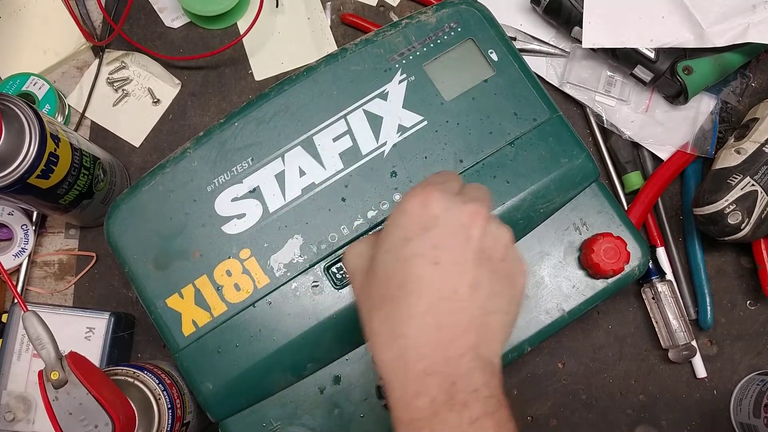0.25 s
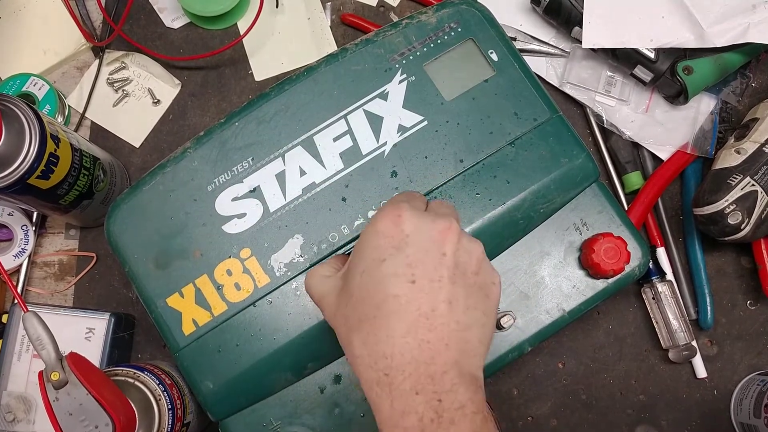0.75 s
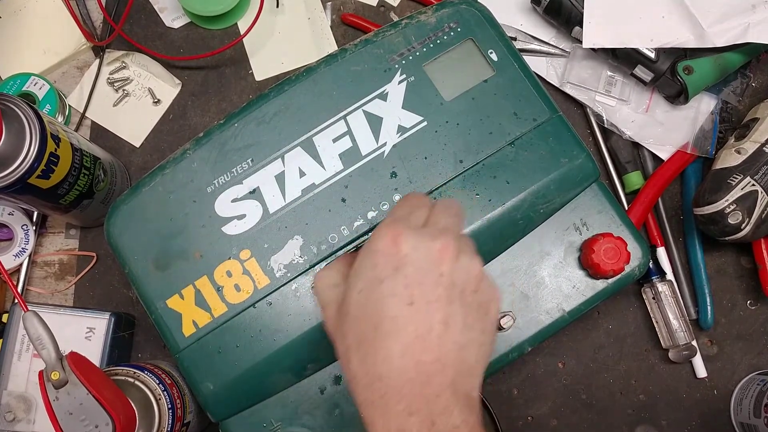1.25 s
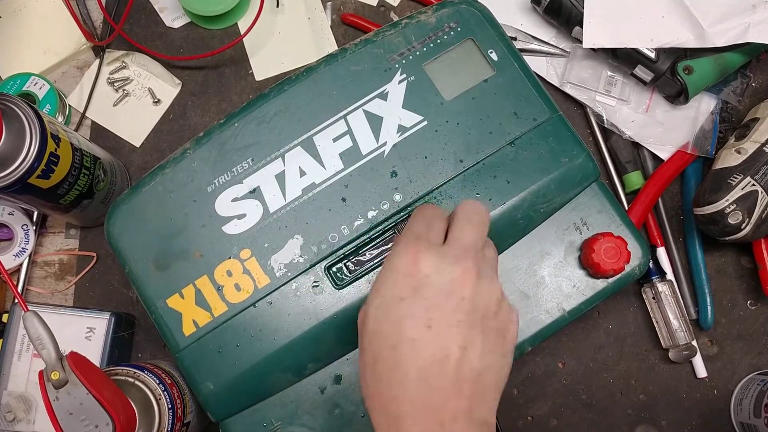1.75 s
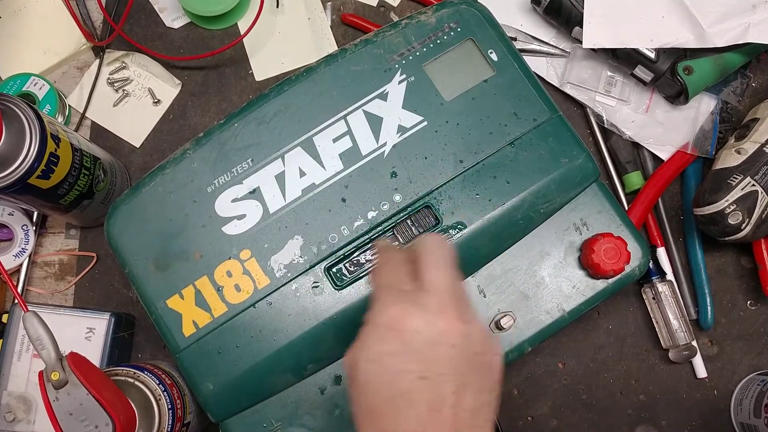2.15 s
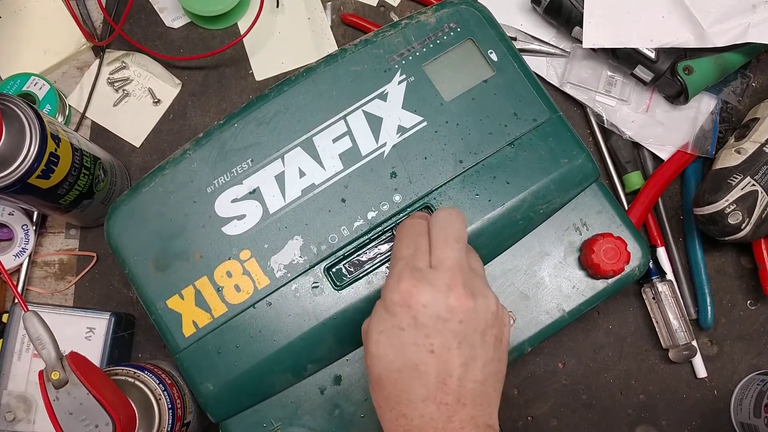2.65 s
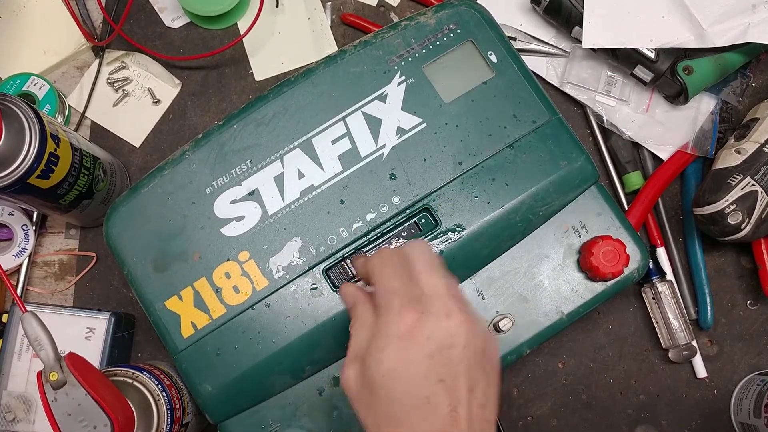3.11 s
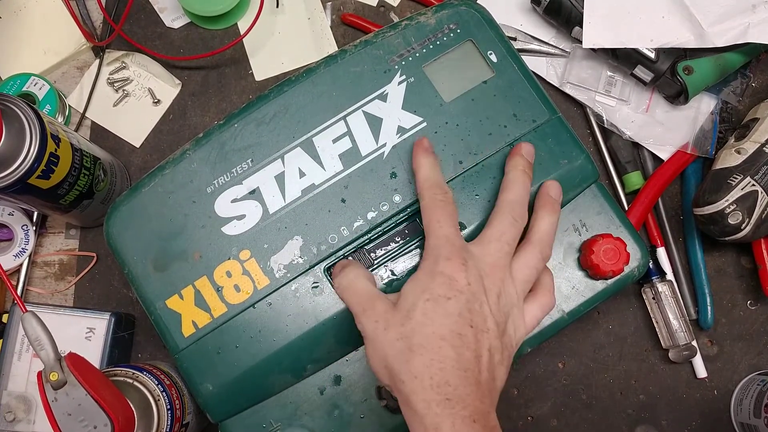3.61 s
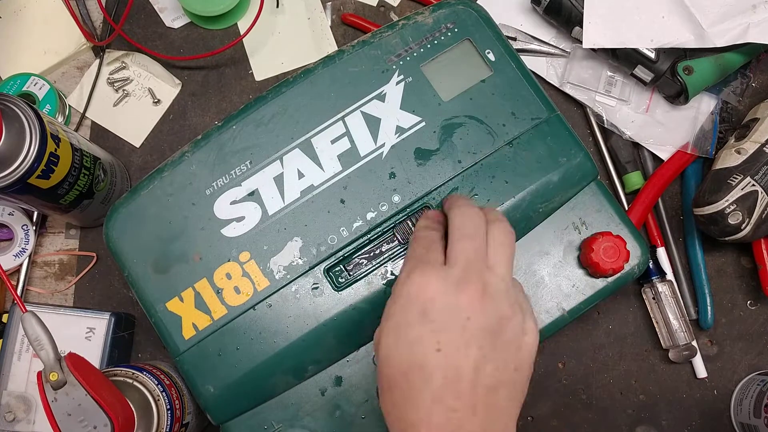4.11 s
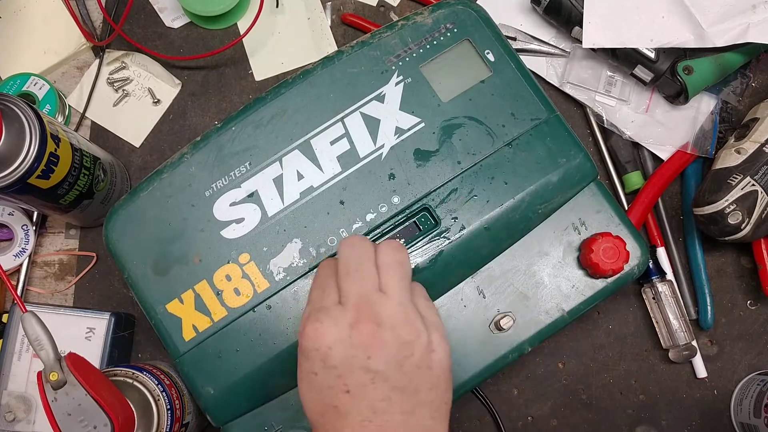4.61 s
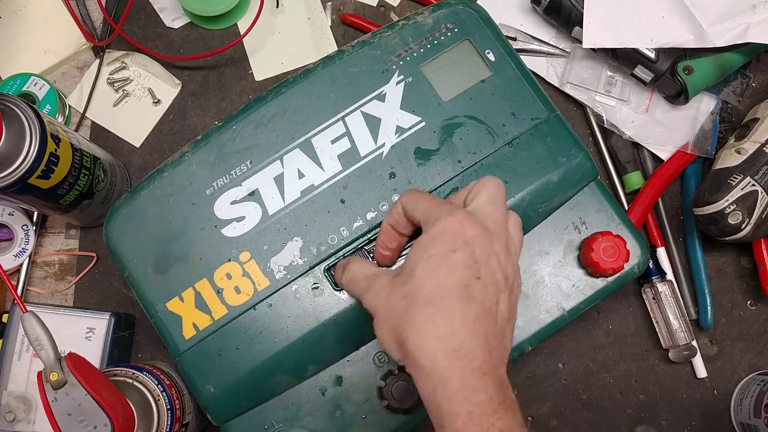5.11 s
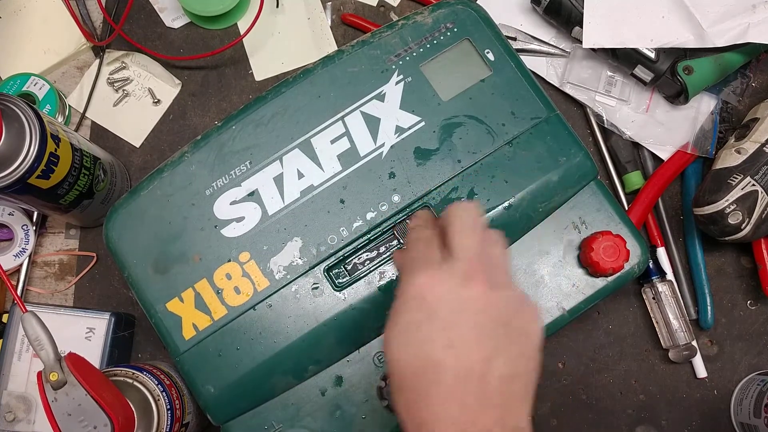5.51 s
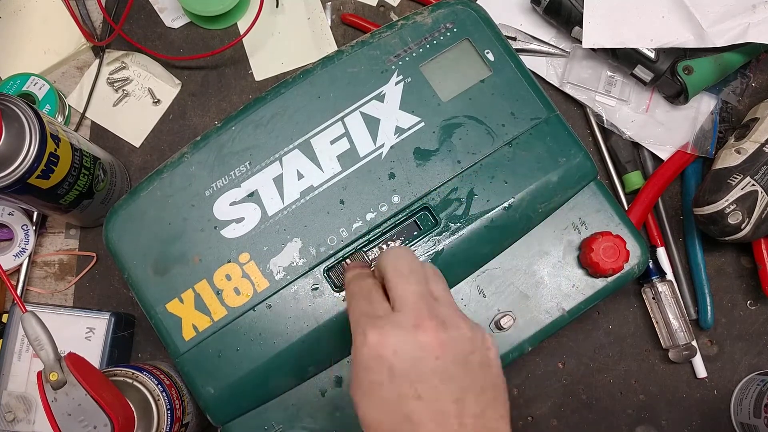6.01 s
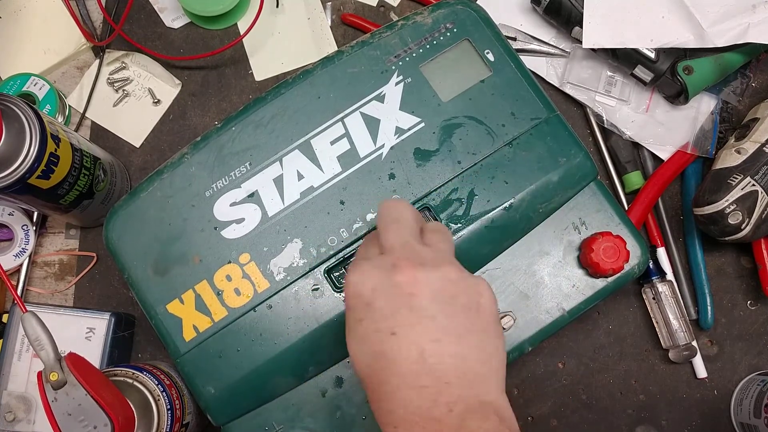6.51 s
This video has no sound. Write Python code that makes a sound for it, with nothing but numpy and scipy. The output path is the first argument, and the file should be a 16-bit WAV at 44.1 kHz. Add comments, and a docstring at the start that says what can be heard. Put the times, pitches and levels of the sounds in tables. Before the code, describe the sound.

Sharp, bright clicks in quick bursts as a notched plastic switch snaps along its track, with hollow knocks and light fingertip taps between.

```python
"""Sharp plastic snaps with a hollow knock: a hand pushes a stiff slider back and forth on a hollow plastic case.
Its spring snaps over a few notches per push, later over five; shaped noise bursts ring spring, slider and case.
In between, fingers tap, nails flick and skin brushes, all shaped noise; lid and cavity add low thumps of sine and noise.
A small room answers over a very faint noise floor, and the sound sits almost wholly on the left.
"""
import sys
import numpy as np
from scipy import signal
from scipy.fft import rfft, irfft, next_fast_len
from scipy.io import wavfile
from scipy.ndimage import uniform_filter1d, map_coordinates

SR = 44100
rng = np.random.default_rng(int(sys.argv[2]) if len(sys.argv) > 2 else 0)


def unload_audio(sound):
    """Save the sound as a 16-bit wav file, at the path given as the first command line argument."""
    columns = np.transpose(np.atleast_2d(sound))
    # keep every value between -1 and 1, then stretch to whole-number steps
    steps = np.round(np.clip(columns, -1, 1) * 32767)
    wavfile.write(sys.argv[1], SR, steps.astype(np.int16))


N = 297675  # length in samples


def amp(db):
    """Turn decibels into a plain multiplier."""
    return 10 ** (np.asarray(db) / 20)


def unit(x):
    """Scale to an average power of one."""
    return x / np.sqrt(np.mean(np.abs(x) ** 2) + 1e-20)


def along(points, hz):
    """Read a curve of (Hz, value) points, joined by straight lines on a log frequency axis."""
    point_hz, value = np.transpose(points)
    return np.interp(np.log(hz + 1), np.log(point_hz), value)


def filtered(x, response):
    """Multiply the spectrum of x by a response that depends on frequency."""
    m = next_fast_len(N + SR // 2)  # spare room keeps the ringing from wrapping round
    hz = np.fft.rfftfreq(m, 1 / SR)
    return irfft(rfft(x, m) * response(hz), m)[..., :N]


def causal(gain):
    """Give a gain curve the minimum-phase response, which rings only after a blow, never before."""
    cepstrum = irfft(np.log(np.maximum(gain, 1e-6)))
    half = len(cepstrum) // 2
    cepstrum[1:half] *= 2
    cepstrum[half + 1:] = 0
    return np.exp(rfft(cepstrum))


def coloured(x, spectrum):
    """Colour x with a causal filter that would keep the power of white noise."""
    return filtered(x, lambda hz: causal(unit(amp(along(spectrum, hz)))))


def body(x, bed, modes, lift_db):
    """Pass x through a solid part: a few resonances stand out of a bed of dense, overlapping modes."""
    def response(hz):
        peaks = 0
        for centre, width, db in modes:
            peaks = peaks + amp(db + lift_db) / (1 + (2 * (hz - centre) / width) ** 2)
        return causal(unit(amp(along(bed, hz)) * (1 + peaks)))
    return filtered(x, response)


def add(track, s, sound):
    """Mix a short sound into the track at time s in seconds."""
    start = max(round(s * SR), 0)
    part = sound[:max(N - start, 0)]
    track[start:start + len(part)] += part


def blows(times, levels, t60, attack, crack, crack_t60, uneven_db=3.0, knot_hz=380):
    """Each blow is noise with a short crack and a longer rattle (times in s), in a random colour of its own."""
    t = np.arange(SR // 5) / SR
    knots = np.fft.rfftfreq(len(t), 1 / SR) / knot_hz
    decay = amp(-60 * t / t60) + crack * amp(-60 * t / crack_t60)
    shape = (1 - np.exp(-t / attack)) * decay
    track = np.zeros(N)
    for s, db in zip(times, levels):
        burst = rfft(shape * rng.standard_normal(len(t)))
        # even out the chance lumps of the noise, then give it smooth ones of a set size
        power = np.abs(uniform_filter1d(np.abs(burst) ** 2, size=60))
        bumps = map_coordinates(rng.standard_normal(size=256), [knots], mode="mirror")
        colour = unit(amp(uneven_db * bumps))
        evened = burst * causal(colour * np.sqrt(power.mean() / power))
        add(track, s, amp(db) * irfft(evened))
    return track


def wobble(rate):
    """A smooth random curve with this many knots a second."""
    knots = rng.standard_normal(int(N * rate / SR) + 4)
    return map_coordinates(knots, [np.arange(N) * rate / SR])


EASE_POWER = 3.5  # the hand holds its force until late in the push
CLACK_DB = -25  # the slider's level at an ordinary notch, before its trim
CLACK_FOLLOWS, KNOCK_FOLLOWS, BOOM_FOLLOWS = 0.6, 0.22, 0.1  # dB lost for each dB of easing
TRACK_NOTCHES = 4  # steps from one end of the track to the other
RUN_UP_POWER = 2.6  # momentum builds late along the track
RUN_UP_CLACK_DB, RUN_UP_KNOCK_DB, RUN_UP_BOOM_DB = 4, 6.5, 11  # gained over the whole track
SLACK_SPRING_DB, SLACK_KNOCK_DB, SLACK_BOOM_DB = 3.5, 0, -8  # relative to the clack as the slack closes
# Pushes of the slider. Each row: first notch in seconds, travel time in seconds, number of notches,
# each gap as a multiple of the one before, spring level in dB, easing by the last notch in dB,
# case knock level in dB, cavity boom level in dB, how much earlier the slack closes in seconds,
# and the clack of that in dB. All four levels are trimmed when played.
SLIDER_PUSHES = [(0.0224, 0.0407, 3, 0.97, -13, -1, -27.5, -39, 0.022, -34),
                 (0.1508, 0.037, 3, 0.92, -10.5, -2.5, -30.5, -42, 0.026, -38),
                 (0.2878, 0.04, 3, 1.1, -12, -5, -28, -42, 0.025, -33),
                 (0.418, 0.042, 3, 0.95, -12, -9, -32.5, -42.5, 0.03, -35.5),
                 (0.5449, 0.0533, 3, 1.8, -13, -21.5, -27.5, -40, 0.026, -28.5),
                 (1.0134, 0.0425, 3, 0.95, -11.5, -12, -31, -43.5, 0.016, -30),
                 (1.2157, 0.027, 2, 1, -18, -7.5, -32, -41.5, 0.0286, -33),
                 (1.5, 0.0553, 4, 1.3, -9, -1.5, -29, -38.5, 0.01, -28),
                 (2.0228, 0.0074, 2, 1, -11.5, 0, -28.5, -38, 0.013, -44),
                 (2.8522, 0.0465, 4, 0.75, -5.5, -4, -27.5, -42.5, 0.009, -30.5),
                 (3.72, 0.032, 5, 1.15, -4.5, -6, -32.5, -53, 0.007, -33.5),
                 (4.4782, 0.0454, 5, 0.86, -7, -3.5, -29.5, -50, 0.012, -32.5),
                 (5.1787, 0.031, 5, 1.05, -5, -2.5, -30, -47.5, 0.011, -41.5),
                 (5.7953, 0.0465, 5, 0.95, -5.5, -6, -30.5, -47.5, 0.0064, -31.5),
                 (6.327, 0.0423, 5, 0.96, -6, -5, -31, -48, 0.011, -39)]


def notches():
    """Each push closes the slack, then runs over notches at a changing pace: time and four levels per blow."""
    blows_by_push = []
    for first, length, count, pace, spring_db, ease_db, knock_db, boom_db, lead, slack_db in SLIDER_PUSHES:
        blows_by_push.append([[first - lead], [slack_db + SLACK_SPRING_DB], [slack_db],
                              [slack_db + SLACK_KNOCK_DB], [slack_db + SLACK_BOOM_DB]])
        k = np.arange(round(count))
        elapsed = np.cumsum(pace ** k) - 1
        eased = ease_db * (k / k[-1]) ** EASE_POWER
        run_up = (k / TRACK_NOTCHES) ** RUN_UP_POWER
        blows_by_push.append([first + length * elapsed / elapsed[-1],
                              spring_db + eased,
                              CLACK_DB + CLACK_FOLLOWS * eased + RUN_UP_CLACK_DB * run_up,
                              knock_db + KNOCK_FOLLOWS * eased + RUN_UP_KNOCK_DB * run_up,
                              boom_db + BOOM_FOLLOWS * eased + RUN_UP_BOOM_DB * run_up])
    return np.concatenate(blows_by_push, axis=1)


# Resonances of the notch spring, the slider and the hollow case.
# Each row: centre in Hz, width in Hz, height in dB before the lift that its player adds.
SPRING_MODES = [(8270, 1800, 3.5), (10430, 1100, -3.5), (12400, 100, -4.5)]
SLIDER_MODES = [(2756, 37, 6), (3690, 31, 3.5), (3740, 1600, 1.5), (4250, 76, 10.5), (6000, 1500, 1)]
CASE_MODES = [(300, 160, -1.5), (738.3, 28, -1.5), (1087, 170, -3.5), (1727, 80, -6.5), (2290, 23, -8)]
# The dense modes under those resonances, and the air inside the case.
# Each row: frequency in Hz, relative level in dB per Hz.
SPRING_DENSE = [(4100, -51.5), (6650, -13), (7750, -2.5), (9350, -6.5), (10450, -1), (12350, -1.2),
                (14050, -5), (16050, -8)]
SLIDER_DENSE = [(1250, -50.5), (2450, -4), (3020, -4), (3650, -2), (5050, -3.5), (6650, -6), (8600, -31),
                (12100, -64)]
CASE_DENSE = [(250, -30.5), (520, -1.5), (800, -2.5), (1090, 0.5), (1460, -1.5), (2350, -1.5), (3350, -25),
              (6100, -66)]
CAVITY_AIR = [(30, -31), (70, -12), (130, -13), (180, 2.5), (230, -10), (280, 8), (420, -1), (750, -12),
              (2000, -56.5)]


def detent():
    """Every notch rings the spring, the slider, the walls of the case and, longest, its cavity."""
    s, spring_db, clack_db, knock_db, boom_db = notches()
    snap = blows(s, spring_db - 3.0, t60=0.042, attack=0.00096, crack=0.64, crack_t60=0.023)
    clack = blows(s, clack_db + 5.5, t60=0.047, attack=0.0011, crack=0.72, crack_t60=0.018)
    knock = blows(s, knock_db + 4.5, t60=0.068, attack=0.00097, crack=0.67, crack_t60=0.023)
    boom = blows(s, boom_db + 8.5, t60=0.1, attack=0.0011, crack=0.43, crack_t60=0.02)
    spring = body(snap, SPRING_DENSE, SPRING_MODES, lift_db=-6.5)
    slider = body(clack, SLIDER_DENSE, SLIDER_MODES, lift_db=-11)
    walls = body(knock, CASE_DENSE, CASE_MODES, lift_db=6.5)
    cavity = coloured(boom, CAVITY_AIR)
    return spring + slider + walls + cavity


TICK_LAG_S = 0.0025  # the loose slider ticks just after the fingertip lands
# Fingers landing on the case. Each row: time in seconds, knock level in dB, tick level in dB (before trims).
FINGER_TAPS = [(0.663, -50, -48), (0.937, -49, -61), (0.955, -40, -45.5), (1.286, -33.5, -54),
               (1.362, -43, -39), (1.765, -31, -37), (1.916, -34, -57), (2.163, -41.5, -41.5),
               (2.19, -28, -34), (2.446, -29.5, -42.5), (2.53, -41, -59.5), (2.77, -45, -48.5),
               (3.17, -51, -51.5), (3.291, -45, -48), (3.453, -37.5, -46), (3.586, -44.5, -40.5),
               (3.897, -31, -29), (4.305, -33, -43), (4.378, -43, -47.5), (4.417, -31, -31.5),
               (4.71, -56.5, -47), (4.766, -49, -48.5), (4.843, -37.5, -51), (4.978, -25.5, -21),
               (5.033, -40.5, -36.5), (5.339, -30.5, -23.5), (5.403, -33.5, -36.5), (5.547, -33.5, -52),
               (5.705, -41.5, -62), (5.736, -33.5, -38), (6.232, -38, -47.5), (6.447, -29, -28),
               (6.576, -31.5, -38), (6.631, -27, -31.5)]
# The tone of a soft fingertip and of the tick. Each row: frequency in Hz, relative level in dB per Hz.
FINGERTIP_TONE = [(40, -30.5), (130, -4), (200, -4), (300, -1), (500, 1), (900, -4.5), (1400, -9),
                  (2300, -14.5), (4000, -21.5), (9000, -48.5)]
SLIDER_TICK_TONE = [(300, -64.5), (1200, -3.5), (2450, -2.5), (4550, -7.5), (7100, -7.5), (11100, -5),
                    (16100, -15)]


def taps():
    """Fingertips knock the case softly while the loose slider ticks."""
    s, knock_db, tick_db = np.transpose(FINGER_TAPS)
    pads = blows(s, knock_db + 1, t60=0.087, attack=0.0027, crack=0.68, crack_t60=0.019)
    ticks = blows(s + TICK_LAG_S, tick_db - 4, t60=0.07, attack=0.0012, crack=0.78, crack_t60=0.022)
    knocks = body(pads, FINGERTIP_TONE, CASE_MODES, lift_db=2.5)  # the fingertip damps the wall it strikes
    return knocks + coloured(ticks, SLIDER_TICK_TONE)


# A fingernail flicks off the slider's ribs.
# Each row: time in seconds, level in dB before its trim, time to fade by 60 dB in seconds.
NAIL_FLICKS = [(0.3677, -20.5, 0.084), (1.6672, -22, 0.11), (2.9532, -20.5, 0.092), (4.2506, -25, 0.12),
               (4.371, -25.5, 0.057), (5.5513, -22, 0.084), (6.7236, -20, 0.077)]
# The tone of nail and skin on plastic. Each row: frequency in Hz, relative level in dB per Hz.
SKIN_TONE = [(410, -35), (700, -12.5), (863, -10.5), (1080, -7), (1540, -17), (2130, -6.5), (2880, -12),
             (3460, -10.5), (3940, -7.5), (4260, -11.5), (5120, -12), (7990, -8.5), (8760, 1), (13500, -5),
             (16000, -12.5)]


def flicks():
    """A nail comes off a rib with a sudden burst of noise that dies away and rings the slider."""
    track = np.zeros(N)
    t = np.arange(SR // 4) / SR
    for s, db, t60 in NAIL_FLICKS:
        fade = amp(db - 5.0 - 60 * t / t60)
        add(track, s, fade * rng.standard_normal(len(t)))
    return body(track, SKIN_TONE, SLIDER_MODES, lift_db=-15)


RUB_RISE_DB, RUB_FALL_DB = 13, 22.5  # a full stroke swells by the first, then fades by the second
# Skin brushing the plastic. Each row: start in seconds, fastest moment in seconds, end in seconds,
# level in dB before its trim. A stroke that ends before its fastest moment is cut short.
SKIN_RUBS = [(1.983, 2.028, 2, -32.5), (2.2, 2.24, 2.34, -58.5), (3.273, 3.329, 3.425, -48.5),
             (3.555, 3.579, 3.76, -58.5), (3.9, 3.98, 4.22, -50.5), (5.452, 5.558, 5.64, -48.5),
             (6.06, 6.155, 6.18, -55), (6.603, 6.628, 6.76, -42.5)]


def rubbing(rough_db=4.2):
    """Skin slides over the plastic with an uneven, fine hiss that rings the slider."""
    t = np.arange(N) / SR
    level = np.zeros(N)
    for start, fastest, end, db in SKIN_RUBS:
        swell = np.interp(t, [start, fastest, end], [-RUB_RISE_DB, 0, -RUB_FALL_DB])
        level += amp(db + swell) * (t > start) * (t < end)
    grain = unit(rng.standard_normal(N) * amp(rough_db * wobble(220)))
    hiss = body(grain, SKIN_TONE, SLIDER_MODES, lift_db=-17.0)
    return amp(3.5) * uniform_filter1d(level, size=600) * hiss


# Low thumps of the case: the lid flexing near 150-215 Hz, the hollow cavity booming after notches at 310-422 Hz.
# Each row: time in seconds, level in dB before trims, pitch in Hz.
CASE_THUMPS = [(0.259, -27.5, 195), (0.523, -33.5, 186), (1.126, -28.5, 190), (1.559, -34, 310),
               (1.624, -34, 182), (2.022, -38.5, 335), (2.929, -31.5, 422), (3.771, -27, 148),
               (3.823, -26, 152), (4.552, -35, 213), (5.289, -28.5, 198), (5.342, -33, 181),
               (6.441, -30, 186), (6.637, -27.5, 185)]
# The tone of the shudder in each thump. Each row: frequency in Hz, relative level in dB per Hz.
SHUDDER_TONE = [(25, -23.5), (45, -18), (62, -4.5), (85, -5), (170, 0), (350, -3), (700, -10.5),
                (2000, -38.5), (5000, -85)]


def thumps(cycles=1.5, push_db=4, shudder_db=-5):
    """The lid or the cavity gives a low sine, over in a few cycles, with a shudder of low noise."""
    track = np.zeros(N)
    t = np.arange(SR // 8) / SR
    for s, db, hz in CASE_THUMPS:
        u = t * hz / cycles
        swell = 2 * u * np.exp(-u * u)
        add(track, s, amp(db + push_db) * swell * np.sin(2 * np.pi * hz * t))
    s, db, _ = np.transpose(CASE_THUMPS)
    shudder = blows(s, db + shudder_db, t60=0.24, attack=0.00087, crack=0.82, crack_t60=0.026)
    return track + coloured(shudder, SHUDDER_TONE)


# How long the room rings. Each row: frequency in Hz, time to fade by 60 dB in seconds.
ROOM_FADE = [(80, 0.54), (280, 0.44), (700, 0.32), (2000, 0.33), (8000, 0.28), (15000, 0.23)]


def room(x, delay=.0074, build=0.0038):
    """A noise tail builds after a delay (s), each frequency fading at its own speed; a new one every 1/3 s."""
    wet, step = np.zeros(N), SR // 3
    for start in range(0, N, step):
        hz, t, z = signal.stft(rng.standard_normal(SR // 2), SR, nperseg=256)
        fade = amp(-60 * t / along(ROOM_FADE, hz)[:, None])
        tail = signal.istft(z * fade, SR, nperseg=256)[1]
        since = np.maximum(np.arange(len(tail)) / SR - delay, 0)
        tail *= 1 - np.exp(-since / build)
        echo = signal.fftconvolve(x[start:start + step], tail / np.linalg.norm(tail))
        add(wet, start / SR, echo)
    return wet


# The still room. Each row: frequency in Hz, relative level in dB per Hz.
STILL_ROOM = [(20, -22), (60, -5.5), (300, 1), (1000, -11.5), (3000, -23), (15000, -27.5)]


def still_room():
    """A very faint, steady noise lies under everything."""
    return amp(-72) * coloured(rng.standard_normal(N), STILL_ROOM)


# What reaches the right channel. Each row: frequency in Hz, level in dB before the trims in scene().
RIGHT_SHARE = [(42, -2.5), (125, -15), (310, -28), (720, -37), (3100, -32), (10100, -40)]


def scene():
    """Slider, hand, thumps and room on the left; the right channel carries only a faint, dull share."""
    slider = detent()
    hand = taps() + flicks() + rubbing()
    low = thumps()
    near = slider + hand + low
    send = amp(-11.5) * slider + amp(-13.5) * hand + amp(-15.0) * low
    left = near + room(send) + still_room()
    share = amp(-4.0) * near + amp(6.5) * room(send, delay=0.002)
    right = filtered(share, lambda hz: amp(along(RIGHT_SHARE, hz)))
    return np.array([left, right + amp(-99) * rng.standard_normal(N)])


TOP_HZ = 15900  # upper band limit


def record(dry):
    """Clip at full scale, then cut very steeply above the band limit."""
    return filtered(np.clip(dry, -1, 1), lambda hz: 1 / (1 + (hz / TOP_HZ) ** 200))


dry = scene()
out = record(dry)
unload_audio(out)
```